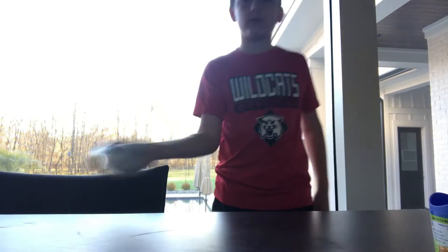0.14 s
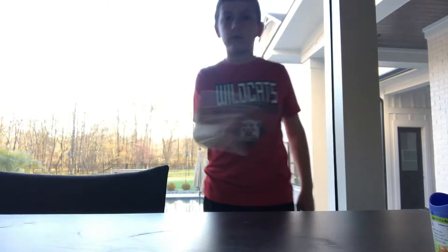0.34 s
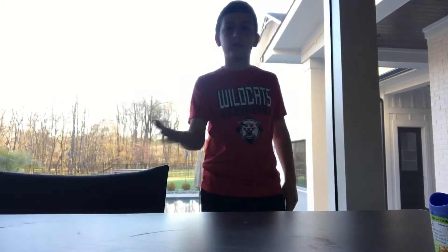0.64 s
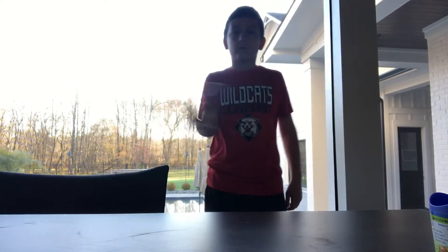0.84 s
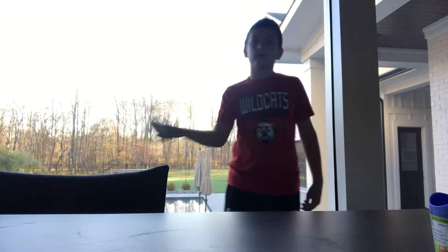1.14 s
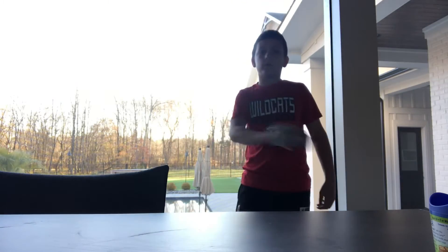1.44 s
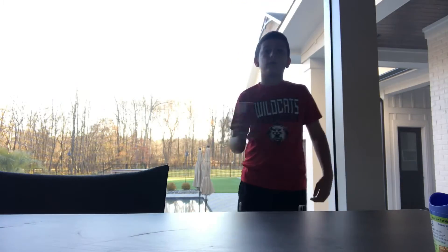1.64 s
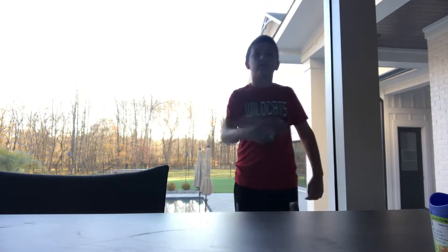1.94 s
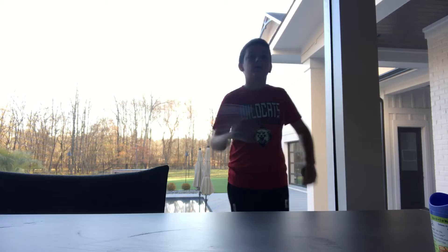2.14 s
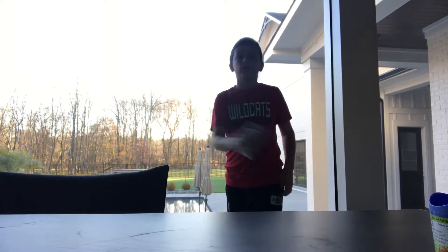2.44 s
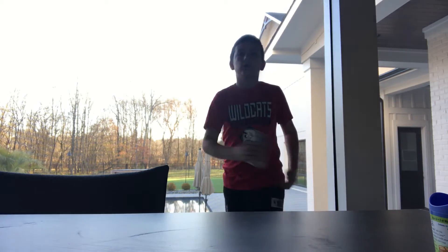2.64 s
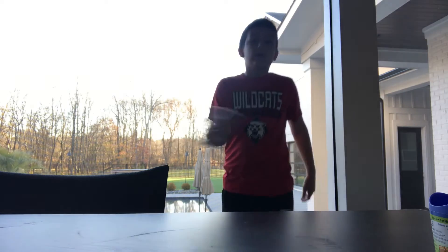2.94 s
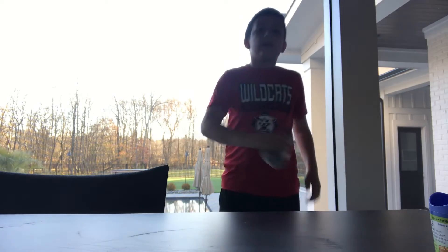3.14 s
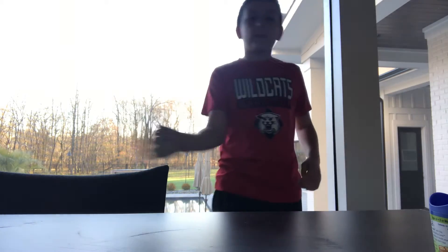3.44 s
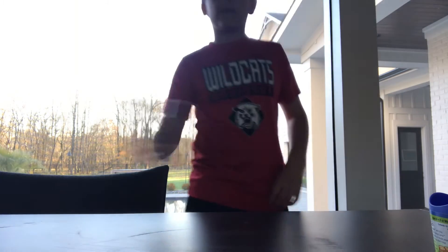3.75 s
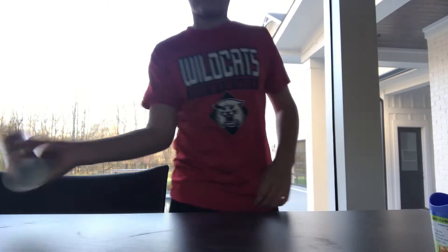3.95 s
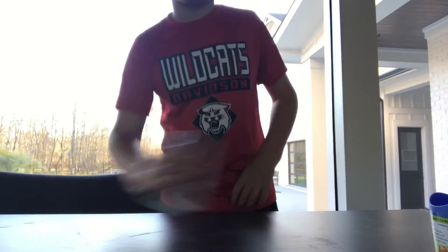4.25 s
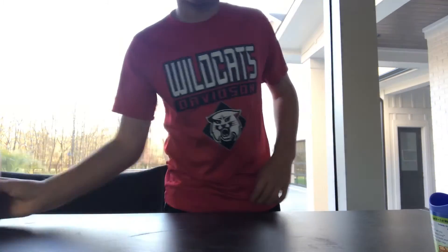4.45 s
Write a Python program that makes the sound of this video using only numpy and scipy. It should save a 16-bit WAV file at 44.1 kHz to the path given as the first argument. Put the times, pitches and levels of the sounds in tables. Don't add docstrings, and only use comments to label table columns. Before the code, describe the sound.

Dice clatter hollowly in a cup, with a busier burst around one second, then settle into a regular shuffle of slide and tumble. The sound is faint and roomy over low rumble and soft hiss. Near the end two heavy slams hit the table beside the microphone, with wooden thuds, sharp plastic cracks, rattling dice and a brief rim drag, stopping abruptly.

```python
import sys
import numpy as np
from scipy import signal
from scipy.fft import rfft, irfft
from scipy.io import wavfile
from scipy.ndimage import uniform_filter1d

SR = 44100
rng = np.random.default_rng(int(sys.argv[2]) if len(sys.argv) > 2 else 0)


def store_pcm(level_fs):
    pcm = np.round(np.clip(level_fs, -1, 1) * 32767).astype(np.int16)
    wavfile.write(sys.argv[1], SR, np.atleast_2d(pcm).T)


def natural_amplitude(level_db):
    exponent = np.asarray(level_db, float) / 20
    return 10 ** exponent


N = 202330

# pitch_hz, level_db (per Hz)
FLOOR_SPECTRUM = [(18, -38), (30, 0.5), (121, -6), (358, -13), (560, -16.5), (639, -21.5), (768, -13),
                  (831, -20), (1480, -16.5), (2320, -19.5), (3360, -21), (14000, -32), (16400, -33)]
# start_s, length_s, first_air_mode_db, second_air_mode_db, second_hz
LANDINGS = [(.01, 0.028, -57, -56, 1788), (0.07, 0.05, -71, -62, 1840), (0.09, 0.02, -66.5, -68, 1850),
            (0.197, 0.019, -60, -56.5, 1840), (0.528, 0.028, -55, -65, 1920),
            (0.559, 0.013, -57, -56, 1790), (0.744, 0.016, -55, -61, 1940), (0.769, .02, -71, -60.5, 1920),
            (0.954, 0.018, -60, -68, 1840), (0.971, 0.0097, -56, -46, 1750), (1.003, 0.01, -49, -45, 1840),
            (1.04, .02, -61, -68, 1800), (1.085, .04, -70, -72, 1845), (1.16, .04, -70, -66, 1840),
            (1.226, 0.019, -57.5, -58, 1936), (1.453, 0.048, -57, -60.5, 1800),
            (1.508, 0.019, -64, -72, 1910), (1.775, 0.026, -55.5, -59.5, 1810),
            (2.063, 0.032, -60, -59, 1860), (2.292, 0.054, -63, -64, 1880),
            (2.578, 0.072, -62.5, -67, 1766), (2.823, 0.044, -59, -59, 1880),
            (3.101, 0.025, -61, -56, 1890), (3.176, .05, -80, -63, 1916), (3.378, 0.041, -61, -58.5, 1880),
            (3.596, 0.046, -56.5, -59, 1784), (3.886, 0.0075, -52.5, -59, 1860),
            (4.171, 0.021, -58.5, -51.5, 1775), (4.266, 0.02, -70, -57, 1920)]
# start_s, length_s, wall_db, wall_hz, first_air_mode_db
SLIDES = [(0.153, 0.015, -62.5, 790, -67), (0.511, 0.0071, -69, 806, -54.5),
          (1.099, 0.028, -61, 853, -57.5), (1.686, 0.035, -68.5, 836, -66), (1.952, 0.024, -60, 834, -65),
          (2.198, 0.049, -63, 1110, -60.5), (2.48, 0.025, -61, 790, -66), (2.712, 0.047, -63.5, 1020, -64),
          (3.028, 0.019, -61.5, 890, -59), (3.264, 0.026, -64, 936, -61.5), (3.531, 0.028, -64, 810, -59),
          (3.797, 0.036, -60.5, 990, -58), (3.853, 0.016, -62, 980, -72), (3.912, 0.01, -62, 920, -68),
          (4.044, 0.0087, -58.5, 790, -66), (4.068, 0.012, -54.5, 790, -78), (4.293, 0.013, -62, 785, -60)]
SWARM_DB = [
    -4.5,
    -4.5,
    -3,
    -1,
]
# pitch_hz, width_hz
AIR_MODES = [
    (648, 44),
    (1850, 115),
    (3400, 240),
]
# factor on the wall pitch, width_hz, level_db
WALL_MODES = [
    (1.011, 145, -1),
    (1.35, 272, -3),
    (1.65, 332, -1.5),
]
# start_s, level_db, pitch_hz
BASE_KNOCKS = [(0.0134, -50.5, 635), (0.0845, -62, 672), (0.1338, -54.5, 660), (0.1596, -69, 696),
               (0.2085, -59, 658), (0.5262, -50, 654), (0.5563, -54, 641), (0.742, -51.5, 653),
               (0.9573, -54.5, 650), (0.9716, -47, 610), (0.9884, -44.5, 614), (1.0046, -46.5, 642),
               (1.0579, -57, 640), (1.1024, -52, 640), (1.2285, -57, 648), (1.4558, -54, 658),
               (1.5046, -53, 630), (1.7743, -53.5, 648), (1.9468, -54.5, 666), (1.9757, -62, 637),
               (2.0551, -55.5, 646), (2.0801, -55.5, 657), (2.2231, -59, 653), (2.2917, -57, 657),
               (2.4961, -59.5, 658), (2.7355, -60, 677), (2.8218, -52.5, 641), (3.0988, -52.5, 648),
               (3.1182, -57, 656), (3.2743, -56.5, 657), (3.3696, -50, 647), (3.3911, -50, 650),
               (3.5195, -55, 672), (3.5775, -57, 635), (3.6017, -48.5, 629), (3.6167, -50.5, 628),
               (3.8115, -52.5, 633), (3.8411, -59, 667), (3.8791, -55, 633), (4.031, -56, 722),
               (4.0427, -53, 665), (4.0667, -53.5, 695), (4.16, -53, 625), (4.1861, -48.5, 620),
               (4.2949, -58, 670)]
# start_s, level_db, pitch_hz
SIDE_KNOCKS = [(0.0007, -41, 1900), (0.0094, -35.5, 1830), (0.0155, -48, 1780), (0.022, -50, 1760),
               (0.0355, -51, 1800), (0.0477, -55, 1840), (0.2059, -47, 1830), (0.557, -49, 1790),
               (0.5669, -47, 1780), (0.7398, -42, 1903), (0.7537, -53, 2000), (0.9525, -54, 1920),
               (0.972, -38.5, 1830), (0.9793, -37.5, 1757), (0.9915, -37.5, 1836), (1.0063, -41, 1835),
               (1.0192, -51, 1790), (1.0327, -54, 1830), (1.0466, -53, 1840), (1.0792, -55, 1880),
               (1.4551, -52, 1800), (1.7727, -55, 1850), (1.9435, -52, 2370), (1.9497, -50, 1960),
               (1.9596, -51, 1920), (2.2888, -54, 1860), (2.316, -59, 1914), (2.489, -54, 1880),
               (2.5772, -59, 1720), (2.7294, -54.5, 1840), (2.819, -47.5, 1900), (2.8409, -54, 1900),
               (3.0385, -52.5, 1850), (3.0917, -55, 1800), (3.1026, -42.5, 1850), (3.1149, -51, 1780),
               (3.3622, -49.5, 1840), (3.3695, -46, 1880), (3.3831, -49.5, 1826), (3.5789, -52, 1740),
               (3.6031, -54, 1800), (3.6121, -45.5, 1780), (3.7906, -48.5, 1940), (3.7966, -58, 1970),
               (3.8034, -61, 1800), (3.8785, -52, 1770), (3.8866, -50.5, 1870), (3.9173, -61, 1830),
               (4.0541, -63, 1770), (4.0656, -49.5, 1950), (4.0749, -55, 1820), (4.1664, -54, 1900),
               (4.183, -47, 1776), (4.2683, -53, 1920), (4.2772, -46.5, 1840), (4.2858, -52, 1810)]
# start_s, level_db, pitch_hz
WALL_KNOCKS = [(0.0133, -52, 1230), (0.1387, -59, 1010), (0.1473, -55, 846), (0.159, -58, 960),
               (0.5499, -55, 1030), (0.5612, -57, 1080), (0.7409, -54, 1180), (0.753, -58, 1090),
               (0.9753, -61, 970), (0.9904, -53, 935), (1.0776, -59, 950), (1.0999, -57, 1020),
               (1.4642, -61, 1003), (1.7744, -57, 1110), (1.9422, -55, 940), (1.9639, -56, 970),
               (2.1898, -59, 990), (2.1995, -53, 1030), (2.4861, -58, 870), (2.7167, -55, 1070),
               (2.7341, -57, 1000), (3.0134, -51.5, 855), (3.2539, -61, 1110), (3.2644, -55, 1010),
               (3.365, -54, 1050), (3.3756, -56, 1200), (3.5138, -52, 855), (3.5225, -56, 980),
               (3.5381, -47, 864), (3.587, -58, 1010), (3.5966, -61, 950), (3.6119, -57, 1270),
               (3.7794, -53, 920), (3.7875, -55, 1020), (3.804, -47.5, 960), (3.8142, -53, 1020),
               (3.8296, -52, 1100), (3.8556, -54, 1010), (3.8811, -57, 1080), (4.0444, -48, 885),
               (4.0558, -56, 910), (4.0731, -51, 883), (4.1635, -57, 910), (4.2985, -55, 1100),
               (4.3165, -57, 930)]
# start_s, peak_db, pitch_hz
DICE_CLICKS = [(0.0016, -41, 5960), (0.0066, -48, 6370), (0.01, -47, 6200), (0.015, -47, 6010),
               (0.018, -47, 5500), (0.5085, -51, 5000), (0.5161, -53, 6510), (0.5251, -55, 6830),
               (0.5517, -42, 5900), (0.5625, -45, 6000), (0.566, -52, 5720), (0.7333, -54, 6150),
               (0.7401, -50, 7900), (0.9543, -53, 6670), (0.9588, -53, 8930), (0.9654, -56, 7810),
               (0.971, -52, 7600), (0.9745, -49, 8040), (0.9818, -54, 7840), (0.9924, -41, 9600),
               (0.9953, -54, 7000), (0.998, -41, 8100), (1.001, -45, 7000), (1.0036, -47, 7190),
               (1.0079, -56, 7000), (1.0282, -57, 5550), (1.0843, -55, 6070), (1.229, -50, 10630),
               (1.236, -51, 10400), (1.24, -58, 9260), (1.4616, -49, 7350), (1.4734, -51, 7270),
               (1.7477, -59, 7330), (1.7725, -55, 7780), (1.7747, -57, 8590), (1.78, -59, 7300),
               (2.579, -49, 5560), (2.583, -50, 6410), (2.5911, -57, 7010), (2.821, -50, 10100),
               (2.825, -56, 8630), (3.3622, -47, 7510), (3.3661, -56, 6540), (3.372, -56, 6030),
               (3.3757, -54, 6990), (3.3917, -56, 6480), (3.585, -56, 5610), (3.588, -48, 5310),
               (3.5946, -54, 6460), (3.599, -50, 6550), (3.6054, -45, 6760), (3.6069, -52, 6560),
               (3.6108, -52, 6570), (3.8799, -57, 6140), (3.8903, -53, 5560), (3.9173, -52, 6320),
               (4.1593, -55, 7790), (4.167, -49, 5570), (4.1723, -47, 6590), (4.1803, -48, 6050)]
# start_s, peak_db, pitch_hz
RIM_CLICKS = [
    (4.5316, -34, 7100),
    (4.538, -33.5, 6930),
    (4.5435, -34, 7230),
    (4.5635, -40, 4750),
]
# start_s, length_s, slow_scuff_db, fast_fizz_db, fizz_centre_hz
SKIDS = [(.002, 0.026, -59, -68, 8400), (0.205, 0.043, -68.5, -72, 8600), (0.523, 0.031, -64.5, -66, 8400),
         (0.563, 0.013, -60, -62.5, 9000), (0.739, 0.029, -59, -65, 11300),
         (0.977, 0.019, -69, -52.5, 9150), (.978, 0.1, -61, -73, 9350), (1.235, 0.051, -64.5, -64.5, 11500),
         (1.471, 0.044, -61.5, -63.5, 8700), (1.75, 0.0099, -69, -68, 11400),
         (1.777, 0.043, -60, -68, 11600), (2.063, 0.05, -62.5, -70, 11500),
         (2.299, 0.037, -61.5, -79, 10500), (2.584, 0.037, -58.5, -65.5, 9500),
         (2.821, 0.027, -57.5, -63.5, 10800), (3.097, 0.035, -61.5, -75, 10500),
         (3.381, 0.031, -56.5, -63, 9500), (3.599, 0.031, -54, -62.5, 11200),
         (3.891, 0.021, -56, -67.5, 9600), (4.17, 0.026, -57.5, -67, 10500),
         (4.43, 0.053, -72, -57.5, 13500)]
# pitch_hz, level_db
SCUFF_SPECTRUM = [(1500, 9.5), (2500, 0.5), (3400, 6), (5000, -2), (7500, -4.5), (10000, -28), (15000, -16)]
# pitch as a factor on its centre, level_db
FIZZ_SPECTRUM = [(.2, -30), (.55, -12.5), (.78, -6), (1.01, 2), (1.25, -7), (1.8, -26)]
# start_s, level_db, tilt_db per octave, rim_crack_db
SLAMS = [
    (4.347, -23.5, 4, -27),
    (4.534, -26, -5, -33.5),
]
# pitch_hz, then in the same order level_db, t60_s
TABLE_HZ = [66, 110, 163, 282, 431, 500, 569, 627, 681, 748, 776, 1513, 1637, 257]
TABLE_RING = [(-23, 0.93), (-19, 0.46), (-13, 0.31), (-8.5, 1), (-9, 0.61), (1, 0.092), (-1.5, 0.078),
              (-39, 0.19), (-0.5, 0.075), (-9.5, 0.22), (-7, 0.21), (-4, 0.11), (-4.5, 0.054), (-16, 0.27)]
# start_s, thud_db, thud_hz, cup_db, cup pitch factor
BLOWS = [(4.346, -41, 350, -11.5, 1), (4.3477, -18, 275, -14, 1.27), (4.349, -38, 727, -7, 1.07),
         (4.3511, -18.5, 278, -3, 1.08), (4.3544, -30, 270, -6.5, 1.06), (4.368, -25, 612, -14, 0.66),
         (4.378, -26, 786, -44, 1.3), (4.392, -27, 532, -23, 1.34), (4.397, -24.5, 443, -21, 0.76),
         (4.405, -26, 638, -34, 1.15), (4.423, -30, 598, -36, 1.5), (4.457, -46, 424, -46, 1.6),
         (4.488, -22, 549, -36, 1.4), (4.5307, -29, 495, -10.5, 0.91), (4.5312, -36, 1010, 4.5, 0.96),
         (4.535, -18, 360, -13, 1.04), (4.541, -25, 270, -4.5, 0.94), (4.546, -32, 504, -16, 1.3),
         (4.551, -34, 310, -20, 1.03), (4.557, -28, 677, -14, 0.79)]
# pitch_hz, level_db, t60_s
CUP_MODES = [(1256, -12.5, 0.012), (1470, 4.5, 0.0069), (1880, -14.5, 0.017), (2287, -14.5, 0.015),
             (3520, -25, 0.013)]
# pitch_hz, level_db
CRACK_SPECTRUM = [(300, -37), (2000, 10.5), (3000, 0.5), (4500, 1), (7000, 0), (9000, -9.5), (13500, -20),
                  (16000, -24)]
# time from the slam_s, level_db
LEAD_IN = [
    (-.013, -47),
    (-.008, -36.5),
    (-.002, -35),
    (.003, -90),
]
# start_s, level_db, pitch_hz
CHATTER = [(4.3613, -20, 1550), (4.3674, -29, 1390), (4.3713, -32, 1470), (4.3816, -30, 1535),
           (4.3864, -30.0, 1420.0), (4.392, -24, 1550.0), (4.3991, -26, 1570.0), (4.4028, -29, 1650.0),
           (4.4125, -31, 1490.0), (4.4188, -35, 1700), (4.423, -39, 1420.0), (4.4284, -41, 1690),
           (4.4315, -39, 1430.0), (4.4393, -44, 1630.0), (4.444, -43, 1650.0), (4.4552, -37.0, 1800.0),
           (4.4654, -41, 1430.0), (4.4692, -38.0, 1600), (4.4761, -40.0, 1580), (4.4832, -36, 1580),
           (4.4866, -45.0, 1621), (4.4925, -40, 1370.0), (4.497, -40.0, 1416), (4.506, -35, 1660),
           (4.5122, -33, 1517), (4.5204, -40, 1980), (4.5569, -30, 1350.0), (4.5648, -24, 1650.0),
           (4.5703, -22, 1650), (4.5745, -23, 1900.0), (4.5777, -30, 1470.0), (4.581, -23, 1790.0),
           (4.5859, -27, 1730.0)]
# start_s, level_db
DRAG = [
    (4.553, -53),
    (4.563, -31.5),
    (4.574, -36),
    (4.584, -33),
    (4.59, -30),
]
# pitch_hz, level_db
DRAG_SPECTRUM = [(300, -55), (900, -8), (1900, 2), (2500, -4), (3200, -23), (5000, -13), (9000, -30),
                 (15000, -34)]
# pitch_hz, t60_s
ROOM_DECAY = [(150, 0.62), (600, 0.45), (2000, 0.49), (5000, 0.58), (12000, 0.4)]
# pitch_hz, level_db
MIC_RESPONSE = [(20, -66), (45, -10), (80, 0), (15500, -2), (16000, -51), (16400, -58)]


def evened(x):
    return x / np.sqrt(np.mean(x ** 2) + 1e-20)


def read(points, hz):
    f, value = np.transpose(points)
    return np.interp(np.log(hz + 1), np.log(f + 1), value)


def envelope(t, points):
    return natural_amplitude(np.interp(t, *np.transpose(points), left=-120))


def add(mix, s, sound):
    part = mix[max(round(s * SR), 0):][:len(sound)]
    part += sound[:len(part)]


def colour(x, points):
    hz = np.fft.rfftfreq(len(x), 1 / SR)
    return irfft(rfft(x) * natural_amplitude(read(points, hz)), len(x))


def resonate(x, hz, width):
    turn = np.exp(2j * np.pi * np.cumsum(hz * np.ones(len(x))) / SR)
    r = np.exp(-np.pi * width / SR)
    smooth = signal.lfilter([1], [1, -r], x / turn)
    return (turn * smooth).real * np.sqrt(2 * (1 - r * r))


def hollow(x, hz, width):
    return resonate(resonate(x, hz, width), hz, 3 * width) * np.sqrt(np.pi * 4 * width / SR)


def ring(modes, rise, pitch=1, count=13000):
    t = np.arange(count) / SR
    tones = sum(natural_amplitude(db - 60 * t / t60) * np.sin(2 * np.pi * hz * pitch * t) for hz, db, t60 in modes)
    return tones * (1 - np.exp(-t / rise))


def strikes(rows, lift_db, rise, t60, lead=0):
    out, t = np.zeros(N), np.arange(4000) / SR
    swell = np.sin(np.pi / 2 * np.minimum(t / (lead + 1e-5), 1)) ** 2
    for s, db, hz in rows:
        add(out, s - lead, swell * ring([(hz, db + lift_db, t60)], rise, count=4000))
    return out


def grit(per_s, spread_db):
    size = natural_amplitude(spread_db * np.minimum(rng.exponential(1, N), 4)) * rng.standard_normal(N)
    return evened(size * (rng.random(N) < per_s / SR))


def swells(s, length, gains, rise, fall):
    t = np.arange(N) / SR
    coarse = t[::32]
    phase = (coarse[:, None] - s) / np.maximum(length, .003)
    bump = np.exp(-np.where(phase < 0, rise, fall) * phase ** 2)
    return [np.interp(t, coarse, bump @ gain) for gain in gains]


def floor():
    hiss = natural_amplitude(-63.5) * evened(colour(rng.standard_normal(N), FLOOR_SPECTRUM))
    return hiss + natural_amplitude(-73) * resonate(rng.standard_normal(N), hz=112, width=18)


def tumbles():
    t = np.arange(N) / SR
    s, length, low_db, second_db, second_hz = np.transpose(LANDINGS)
    run_s, run_length, wall_db, grip_hz, run_low_db = np.transpose(SLIDES)
    landed = swells(s, length, natural_amplitude([low_db, low_db - 4.5, second_db]), 4.2, 1.17)
    slid = swells(run_s, run_length, natural_amplitude([run_low_db, wall_db, wall_db - 1.5]), 1.43, 1.2)
    low_trim, second_trim, wall_trim, _ = natural_amplitude(SWARM_DB)
    low, wall, second = np.add(landed, slid)
    lag_s, roll_s, roll_db = 0.049, 0.03, -20.5
    roll = swells(s + lag_s, roll_s, natural_amplitude([second_db + roll_db]), 2.5, 1.6)[0]

    low_taps = low * low_trim * grit(2000, 1.5) + natural_amplitude(-77) * grit(2000, 1.5)
    out = hollow(low_taps, *AIR_MODES[0])
    taps = (second * second_trim + roll) * grit(4000, 1.0) + natural_amplitude(-79) * grit(2000, 1.5)
    out += hollow(taps, np.interp(t, s, second_hz), 80)
    out += natural_amplitude(-10) * hollow(taps, AIR_MODES[2][0], 120)

    wall_taps = wall * wall_trim * grit(1500, 1.8)
    wall_hz = np.interp(t, run_s, grip_hz)
    for factor, width, db in WALL_MODES:
        out += natural_amplitude(db) * hollow(wall_taps, factor * wall_hz, width)

    out += strikes(SIDE_KNOCKS, 5.7, rise=0.00071, t60=0.021)
    third_mode = np.multiply(SIDE_KNOCKS, [1, 1, 1.82])
    out += strikes(third_mode, -10, rise=0.00097, t60=0.026)
    out += strikes(BASE_KNOCKS, 8.4, rise=0.0028, t60=0.055, lead=0.002945)
    return out + strikes(WALL_KNOCKS, 5.6, rise=0.001, t60=0.02)


def ticks():
    out, t = np.zeros(N), np.arange(-12, 160) / SR
    shape = np.exp(-np.where(t < 0, -t / .00005, t / 0.00014))
    skitter = natural_amplitude(-21) * (t > 0) * np.exp(-t / 0.001)
    for s, db, hz in DICE_CLICKS + RIM_CLICKS:
        phase = 2 * np.pi * hz * t
        tick = np.sin(phase) + 0.18 * np.cos(1.55 * phase) + 0.64 * np.sin(0.65 * phase)
        tick += .5 * rng.standard_normal(len(t))
        add(out, s - .0003, natural_amplitude(db + 8.0) * (shape * tick + skitter * rng.standard_normal(len(t))))
    return signal.sosfilt(signal.butter(2, 13500, fs=SR, output="sos"), out)


def skids():
    s, length, scuff_db, fizz_db, fizz_hz = np.transpose(SKIDS)
    run_s, run_length, wall_db = np.transpose(SLIDES)[:3]
    landed = swells(s, length, natural_amplitude([scuff_db, fizz_db]), 2.3, 2.0)
    slid = swells(run_s, 1.47 * run_length, natural_amplitude([wall_db - 5.5, wall_db - 17]), 2.8, 1.7)
    scuff, fizz = np.add(landed, slid) * natural_amplitude(SWARM_DB[3])
    out, centre = np.zeros(N), np.interp(np.arange(N) / SR, s, fizz_hz)
    for hz in np.geomspace(1800, 15000, num=18):
        cycles = np.arange(round(6 * SR / hz)) * hz / SR
        grain = np.hanning(len(cycles)) * np.sin(2 * np.pi * cycles)
        level = scuff * natural_amplitude(read(SCUFF_SPECTRUM, hz))
        level += fizz * natural_amplitude(np.interp(hz / centre, *np.transpose(FIZZ_SPECTRUM)))
        patch = evened(uniform_filter1d(rng.standard_normal(N // 441 + 2), size=7))
        level *= natural_amplitude(np.interp(np.arange(N) / 441, np.arange(len(patch)), 4 * patch))
        grains = evened(signal.oaconvolve(grit(1500, 1.6), grain)[:N])
        out += level * np.sqrt(hz / 60000) * grains
    return out


def slam():
    out, rim = np.zeros(N), np.zeros(N)
    t, clock = np.arange(1024) / SR, np.arange(N) / SR
    for s, db, tilt, _ in SLAMS:
        modes = [(hz, level + tilt * np.log2(hz / 300), t60) for hz, (level, t60) in zip(TABLE_HZ, TABLE_RING)]
        add(out, s, natural_amplitude(db) * ring(modes, rise=0.0005))
    for s, thud_db, thud_hz, cup_db, pitch in BLOWS:
        start, _, _, first_db = SLAMS[int(s > 4.51)]
        crack_db = first_db - 26.5 * (1 - np.exp((start - s) / 0.013))
        crack = evened(colour(rng.standard_normal(1024), CRACK_SPECTRUM)) * np.exp(-t / 0.0018)
        add(out, s, ring([(thud_hz, thud_db, .06)], rise=0.00094))
        add(out, s, natural_amplitude(cup_db) * ring(CUP_MODES, 0.0011, pitch))
        add(out, s, natural_amplitude(crack_db) * crack)
        at = round(start * SR)
        rim[at] = np.hypot(rim[at], natural_amplitude(crack_db + 17.0))
    out += strikes(CHATTER, 3, rise=0.00059, t60=0.012)
    lead_in = natural_amplitude(-4) * envelope(clock - 4.348, LEAD_IN) + natural_amplitude(-1) * envelope(clock - 4.532, LEAD_IN)
    out += hollow(lead_in * rng.standard_normal(N), hz=2130, width=440)
    out += envelope(clock, DRAG) * evened(colour(grit(6000, 1.2), DRAG_SPECTRUM))
    body = signal.sosfilt(signal.butter(2, 110, "high", fs=SR, output="sos"), out)
    return body, colour(rim, CRACK_SPECTRUM)


def room(x):
    out, turn = np.zeros(N), np.arange(N) / SR * 40 * np.pi
    for k in range(3):
        taps = np.zeros(SR)
        at = np.arange(260, SR - 20, 20)
        at = at + rng.integers(0, 20, len(at))
        taps[at] = rng.choice([-1., 1.], len(at))
        hz, t, z = signal.stft(taps, SR, nperseg=256)
        decay = natural_amplitude(-60 * t / read(ROOM_DECAY, hz)[:, None])
        tail = signal.istft(z * decay, SR, nperseg=256)[1]
        share = np.sqrt(2 / 3) * np.cos(turn + k * np.pi / 3)
        out += signal.fftconvolve(x * share, tail / np.linalg.norm(tail))[:N]
    return out


def scene():
    hollows = tumbles()
    hiss = skids() + ticks()
    body, rim = slam()
    wet = room(natural_amplitude(-12.5) * hollows + natural_amplitude(-8.0) * hiss + natural_amplitude(-10.0) * body + rim)
    return (hollows + hiss + body + wet + floor())[None]


def roll_off(x):
    return signal.sosfilt(signal.butter(12, 16500, fs=SR, output="sos"), x)


def record(dry):
    end_s, fade_s = 4.588, .001
    heard = colour(np.pad(dry[0], (0, SR)), MIC_RESPONSE)[:N]
    heard = heard * np.clip((end_s - np.arange(N) / SR) / fade_s, 0, 1)
    return roll_off(heard[None])


dry = scene()
out = record(dry)
store_pcm(out)
```